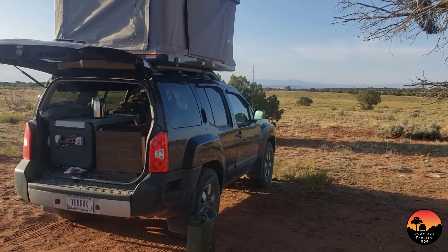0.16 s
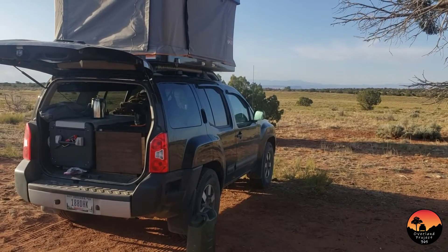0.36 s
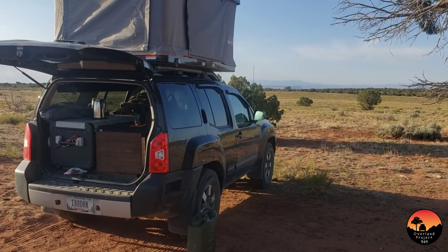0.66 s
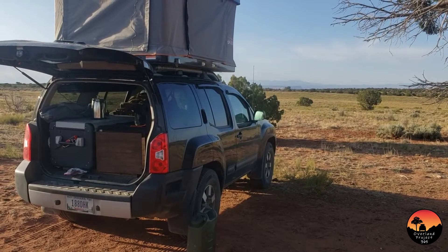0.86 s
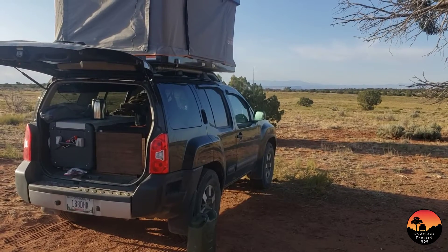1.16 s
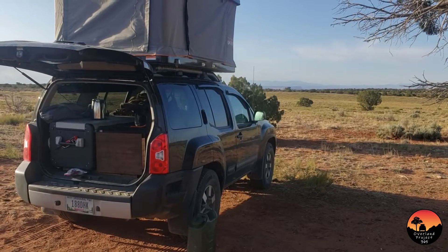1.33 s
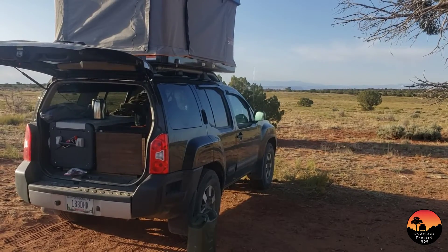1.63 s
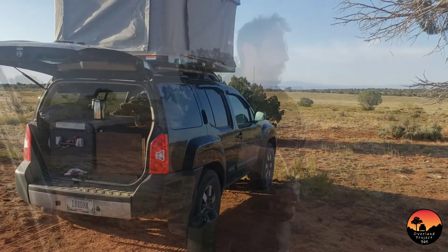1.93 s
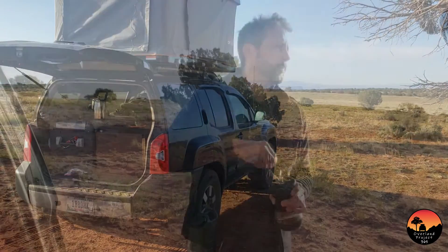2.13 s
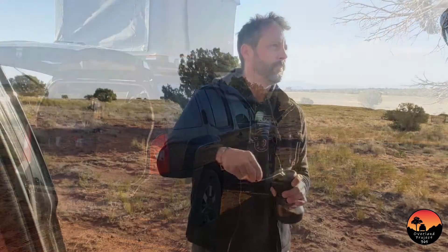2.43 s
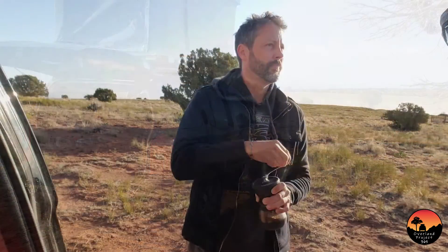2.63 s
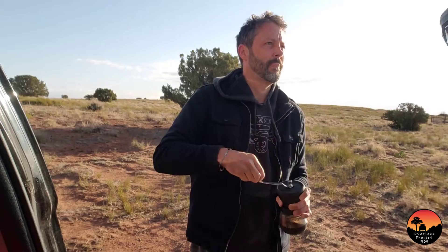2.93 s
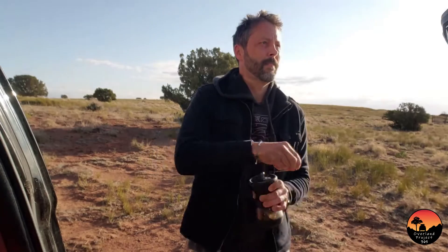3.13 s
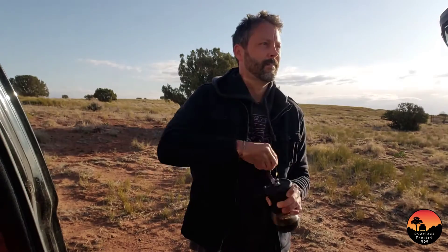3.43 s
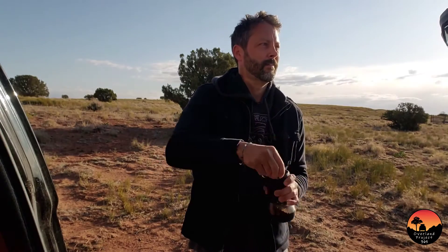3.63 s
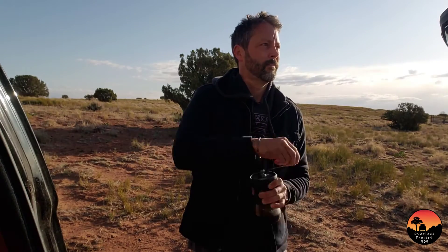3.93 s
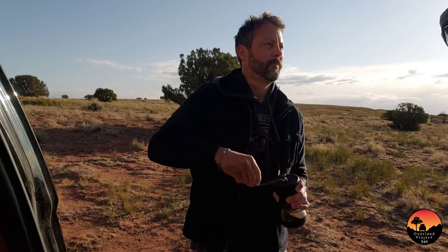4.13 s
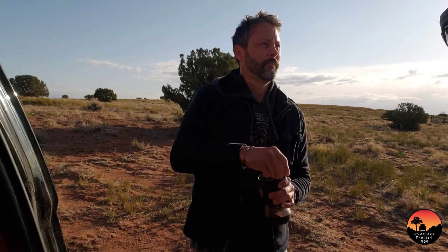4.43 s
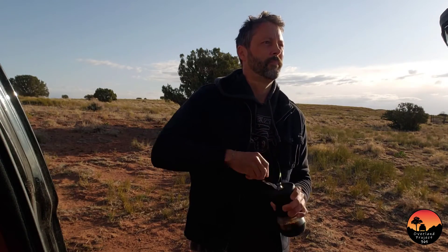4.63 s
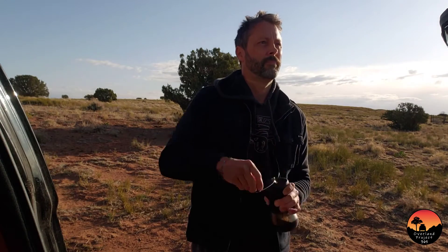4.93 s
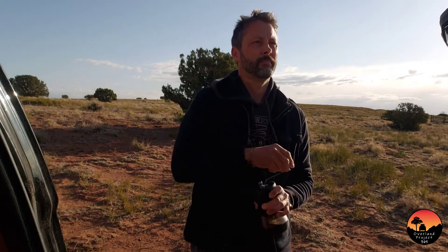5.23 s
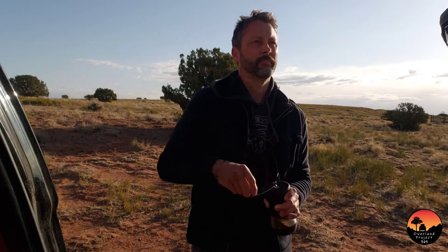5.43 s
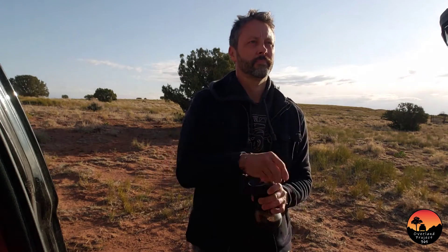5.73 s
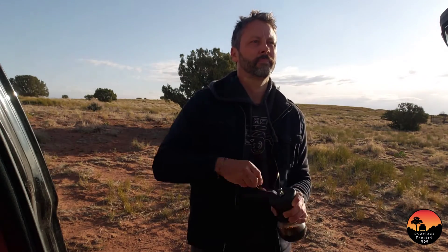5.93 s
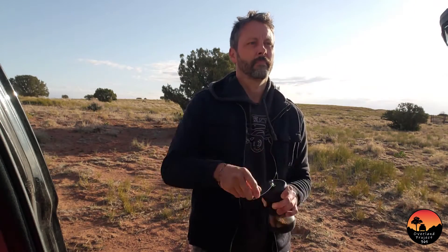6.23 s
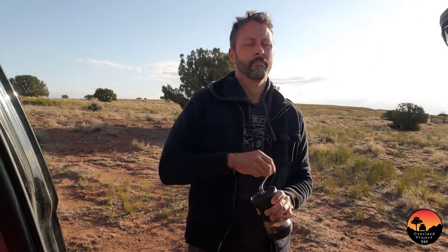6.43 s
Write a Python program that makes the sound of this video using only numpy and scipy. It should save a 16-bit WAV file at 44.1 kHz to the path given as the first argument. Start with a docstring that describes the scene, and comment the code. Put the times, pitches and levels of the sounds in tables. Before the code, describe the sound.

First only soft, low wind and a thin steady hiss in open desert air. Then manual coffee grinding fades in over about a second, close and dry: irregular hard cracks, small chips and fine grit ringing a small housing, pushed harder roughly twice a second. A low hollow judder comes from the jar beneath. The crunching is still going when it stops.

```python
"""First a low breeze at an open, quiet campsite, made of coloured noise; it moans softly in the gusts over a faint hiss.
Then a hand-crank coffee grinder fades in: beans crumble and snap between the burrs, hardest in each turn's push.
Each fracture is a burst of tiny blows that rings the housing, and a judder of small blows makes the jar rumble.
Clothes, a parked car and the ground add a very short scatter of reflections, made of moving delays."""
import sys
import numpy as np
from scipy import signal
from scipy.fft import rfft, irfft, next_fast_len
from scipy.io import wavfile
from scipy.ndimage import uniform_filter1d, map_coordinates

SR = 44100
rng = np.random.default_rng(int(sys.argv[2]) if len(sys.argv) > 2 else 0)


def dump_mix(stems):
    """Bounce the given channels to the path in sys.argv[1] as a 16-bit WAV at rate SR."""
    frames = np.atleast_2d(stems).T  # one column per channel
    limited = np.clip(frames, -1, 1)  # hard clip at full scale
    pcm = np.round(limited * 32767).astype(np.int16)
    wavfile.write(sys.argv[1], SR, pcm)


N = 289737

# spectra of the breeze, its moan and the steady hiss, each relative: pitch_hz, level_db (per Hz)
BREEZE_COLOUR = [(15, -59), (25, -32), (64, -1), (81, -4.5), (97, -6), (123, -6.5), (182, 0), (230, -12),
                 (300, -46), (510, -120)]
MOAN_COLOUR = [(150, -27), (240, -6), (290, 1.5), (340, -3.5), (400, -19.5), (560, -28), (1000, -47),
               (2000, -90)]
HISS_COLOUR = [(350, 3), (600, -4), (943, -8.5), (1240, -8.5), (1560, -10.5), (1670, -10.5), (4420, -13),
               (7140, -21), (9140, -20), (11700, -7.5), (15800, -7.5)]
# gusts of the breeze, before left and right are balanced: centre_s, half_length_s, rumble_db, moan_db
GUSTS = [(0.282, 0.34, -66.5, -75.5), (1.53, 0.15, -70, -70)]
# hard push in each turn of the crank, before the layers are mixed:
# centre_s, half_length_s, crumbling_db, grit_db (fine grit scraping on the burrs)
CRANK_PUSHES = [(2.173, 0.098, -42.5, -51.5), (2.516, 0.085, -45, -54), (3.008, 0.043, -45.5, -55),
                (3.48, 0.062, -41, -47), (3.853, 0.13, -44.5, -55), (4.374, 0.052, -53, -64),
                (4.77, 0.15, -49, -60), (5.176, 0.085, -44, -51), (5.668, 0.15, -43.5, -53.5),
                (6.095, 0.11, -43, -50), (6.567, 0.026, -58, -64)]
# loudest beans snapping: start_s, drive_db (middle modes), body_db and edge_db (low and high modes,
# relative to drive_db), crack_share (0-1, weight of the first crack against the debris)
BEAN_SNAPS = [(2.0041, -44, -2, -25, 0.1), (2.137, -37, -24, -17, 0.9), (2.1778, -38, -14.5, -17, 0.6),
              (2.2741, -34.5, -10, -22, 0.54), (2.3181, -40.5, -3, -10, 0.2), (2.4106, -38.5, -10, -15, 1),
              (2.4399, -27.5, -10, -23, 0.65), (2.4799, -32, -8, -11, 0.47), (2.6288, -34, -10, -18, 0.35),
              (2.7383, -35, -5, -25, 0.5), (2.7711, -30.5, -11, -16.5, 1), (2.9094, -26, -24, -12, 0.94),
              (2.9492, -33, -9, -16, 0.65), (3.03, -28.5, -26, -27, 0.88), (3.0521, -30, -15, -11, 0.83),
              (3.2289, -34, -9, -27, 0.6), (3.2543, -33, -6.5, -23, 0.17), (3.3125, -29.5, -13, -11, 0.82),
              (3.3652, -35.5, -22, -8.5, 0.6), (3.377, -32, -22, -10, 1), (3.4165, -44, -11, -21, 0.7),
              (3.4422, -35, -13, -16, 0.7), (3.5015, -30, -11, -7, 0.65), (3.5793, -33, -9, -26, 0.6),
              (3.6321, -33, -12, -14.5, 0.43), (3.6546, -26, -19, -28, 1), (3.7216, -34, -3.5, -16, 0.24),
              (3.7454, -27, -24, -14, 0.5), (3.8014, -36.5, -6.5, -20, 0.7), (3.8197, -27, -8.5, -10, 0.5),
              (3.9019, -26, -7, -14, 0.72), (3.9214, -41, -3, -24, 0.95), (3.9953, -28.5, -8.5, -17, 0.27),
              (4.1336, -28, -9, -15.5, 0.56), (4.1865, -32.5, -14, -16.5, 0.45),
              (4.336, -32.5, -9, -17, 0.2), (4.3627, -25.5, -9, -19, 0.4), (4.5078, -30.5, -5.5, -14, 0.63),
              (4.595, -30, -11, -9.5, 0.97), (4.6708, -36, -25, -10, 0.7), (4.7022, -29, -21, -31, 0.84),
              (4.7123, -34, -11, -12, 0.34), (4.7416, -23, -9, -12.5, 0.99), (4.8269, -33, -8, -14, 0.7),
              (4.8606, -39, -9, -16, 0.7), (5.009, -31.5, -23, -16, 0.45), (5.0221, -30.5, -31, -13, 0.5),
              (5.1385, -25.5, -10.5, -11, 0.46), (5.173, -30, -8, -10, 0.5), (5.2173, -31, -27, -23, 0.8),
              (5.2614, -33, -15, -14, 0.46), (5.3467, -37, -19, -26, 0.9), (5.4326, -40.5, 2, -13, 0.96),
              (5.5727, -35.5, -6, -11, 0.54), (5.6548, -31.5, -18, -13, 0.88),
              (5.7022, -30.5, -12, -19, 0.87), (5.7289, -38, -5, -23, 0.5),
              (5.7881, -33.5, -3.5, -15, 0.35), (5.8865, -33.5, -4.5, -13, 0.6),
              (5.9377, -32.5, -9, -15, 0.7), (5.9755, -33, -25, -14, 0.3), (6.0362, -33.5, -18, -15, 0.9),
              (6.1127, -31, -12, -7.5, 0.9), (6.1404, -34, -4, -10, 1), (6.1684, -34, -18, -10, 0.7),
              (6.2075, -32, -4.5, -14, 0.44), (6.351, -38, -25, -6, 0.5), (6.4413, -32, -29, -14, 0.57),
              (6.5256, -33, -19, -17, 0.6), (6.539, -28, -13, -14.5, 0.35)]
# extra drive of every snap on the low, middle and high modes: drive_db
SNAP_DRIVE_DB = [25.5, 16.5, 29]
# resonances of the burrs and their housing; width is for one of two equal stages, level is relative:
# pitch_hz, width_hz, level_db (both stages), left_minus_right_db, right_lead_rad
BURR_MODES = [(660.6, 216, -9.5, 1.5, 1.11), (838, 160, -12, -15, 1.77), (1048, 220, -18.5, 6, -0.33),
              (1394, 700, -14, -2, -1.8), (1936, 406, -18, 17, 1.1), (2142, 344, -10, 0.5, 0.47),
              (2600, 500, -15, 0.5, -1.26), (3514, 900, -15.5, 5.5, -1.7), (4520, 1300, -20.5, -1, -1.55),
              (6070, 1300, -24, -5, -1.35), (6810, 345, -25, -14, -0.29), (10280, 3800, -34, -3.5, 0.69),
              (11390, 740, -23, -1.5, -0.094), (12330, 900, -22.5, -9, 0.2), (13600, 7200, -32, -3, -0.78)]
# hollow resonances of the hand-held jar, same columns:
# pitch_hz, width_hz, level_db, left_minus_right_db, right_lead_rad
JAR_MODES = [(79.8, 50.5, -6.5, -8.5, 0.082), (137, 62.5, -4, -3.5, -0.073), (167.9, 39.2, 1.5, -5.5, 0.15),
             (197.2, 23, -3, 7.5, 0.03), (315.6, 102, -8, -4.5, 0.71), (399, 124, -9.5, -3.5, 0.82)]
# loudness of the jar's rumble before its overall trim, with a thump near 3.68 s: time_s, level_db
JAR_RUMBLE = [(1.8, -71.5), (2.2, -53), (2.94, -45), (3.42, -47.5), (3.46, -44.5), (3.61, -49), (3.68, -42),
              (3.75, -47), (3.92, -46), (6.49, -48.5), (6.5, -47)]

BREEZE_REST_DB, MOAN_REST_DB = -73.5, -84  # between the gusts
HISS_DB = -74
CRUMB_REST_DB, GRIT_REST_DB = -46.5, -59  # between the pushes, before mixing
RUB_DB = -50  # beans tumbling steadily against the housing, before the fade
# the grinding cuts in softly and fades up
FADE_START_S, FADE_S, FADE_POWER, FADE_FROM_DB = 1.85, 0.99, 1.2, -22.5
CRACK_DELAY_S = .0011  # time from a snap's listed start to its crack
CHIPS_PER_S, CHIP_DB, CHIP_SPREAD_DB = 17, 21.5, 7  # chip level is added to crumbs of rms 1
GRIND_DOWN_DB, GRIND_DOWN_S = -0.8, 0.025  # grinding of the pieces: level against splinters, decay
BUILD_S, SPLINTER_S, CHIP_S = .0016, .009, .004  # rise before the crack; decay for a bean, for a chip
JAR_TRIM_DB = 0.5
TOP_HZ = 15900


def undb(db):
    """Turn decibels into a gain."""
    return 10 ** (np.asarray(db) / 20)


def unit(x):
    """Scale to rms 1."""
    return x / np.sqrt(np.mean(x ** 2))


def walk(rate):
    """Random wander with a spread near 1: straight lines between `rate` random points a second."""
    steps = np.arange(N) / SR * rate
    return 1.2 * np.interp(steps, np.arange(N // 8), rng.standard_normal(N // 8))


def coloured(points):
    """Two unrelated noises, shaped to the given spectrum."""
    hz, db = np.transpose(points)
    f = np.maximum(np.fft.rfftfreq(N, 1 / SR), 1)
    shape = undb(np.interp(np.log(f), np.log(hz), db))
    white = rng.standard_normal((2, N))
    return unit(irfft(rfft(white) * shape, N))


def swells(rest_db, times, lengths, peaks_db):
    """Gain that rises and falls smoothly round the given moments; rest and bumps add as powers."""
    t = np.arange(0, N, SR // 500) / SR
    bumps = undb(peaks_db) ** 2 * np.exp(-((t[:, None] - times) / lengths) ** 2)
    gain = np.sqrt(undb(rest_db) ** 2 + bumps.sum(axis=1))
    return np.interp(np.arange(N) / SR, t, gain)


def outdoors():
    """A low breeze, nearly alike in both ears, moans softly in the gusts under a faint steady hiss."""
    times, lengths, rumble_db, moan_db = np.transpose(GUSTS)
    rumble = coloured(BREEZE_COLOUR) * swells(BREEZE_REST_DB, times, lengths, rumble_db)
    rumble = rumble * undb(walk(10))  # wanders by about 1 dB
    moan = coloured(MOAN_COLOUR) * swells(MOAN_REST_DB, times, lengths, moan_db)
    mid, side = rumble + moan
    breeze = mid + undb(-17.0) * side * np.array([[1], [-1]])
    breeze = breeze * undb([[-2], [1.6]])  # a little stronger on the right
    return breeze + undb(HISS_DB) * coloured(HISS_COLOUR)


def grains(rate, spread_db):
    """Tiny fractures of unequal size at random moments, `rate` a second on average."""
    hits = rng.random(N) < rate / SR
    return hits * undb(spread_db * np.clip(rng.standard_normal(N), -2, 2))


def cascades(rate, spread_db, decay_s, steady):
    """Strength of fracturing: flurries start at once and die away, over a steady share."""
    decay = np.exp(-1 / (decay_s * SR))
    flurries = signal.lfilter([1], [1, -decay], grains(rate, spread_db))
    return steady + unit(flurries)


def fade_in():
    """Gain that brings the steady grinding in."""
    progress = (np.arange(N) / SR - FADE_START_S) / FADE_S
    first = undb(FADE_FROM_DB)
    return (progress > 0) * (first + (1 - first) * np.clip(progress, 0, 1) ** FADE_POWER)


def fracture(crack_share, splinter_s):
    """A sharp crack amid dying splinters, then the pieces are ground down; returns times and force."""
    t = np.arange(-SR // 100, SR // 10) / SR

    def shower(decay_s):
        """Power of small pieces that start just before the crack, and trail after it."""
        envelope = np.exp(np.minimum(t / BUILD_S, -t / decay_s))
        pieces = (rng.random(len(t)) < .02) * rng.random(len(t)) * envelope
        return pieces ** 2 / np.sum(pieces ** 2)

    # the crack is one hard blow with a few close aftershocks
    aftershocks = (rng.random(len(t)) < .16) * (t > 0) * np.exp(-abs(t) / .0006)
    crack = (t == 0) + aftershocks
    crack_power = crack ** 2 / np.sum(crack ** 2)
    debris_power = shower(splinter_s) + undb(GRIND_DOWN_DB) ** 2 * shower(GRIND_DOWN_S)
    share = np.clip(crack_share, 0, 1)
    return t, np.sqrt(share * crack_power + (1 - share) * debris_power)


def chips():
    """Small pieces crack at loosely even intervals as the teeth of the burr catch them."""
    force = np.zeros(N + SR)
    for k, (slip, size) in enumerate(rng.uniform(-1, 1, (200, 2))):
        start = int((k + .5 + slip / 2) / CHIPS_PER_S * SR)
        if start < N:
            t, burst = fracture(crack_share=0.67, splinter_s=CHIP_S)
            force[start:start + len(t)] += undb(CHIP_DB + CHIP_SPREAD_DB * size) * burst
    return force[:N]


def snaps():
    """Whole beans snap; each gives a force on the low, middle and high modes."""
    force = np.zeros((3, N + SR))
    for start_s, drive_db, body_db, edge_db, crack_share in BEAN_SNAPS:
        t, burst = fracture(crack_share, SPLINTER_S)
        start = int((start_s + CRACK_DELAY_S + t[0]) * SR)
        push_db = drive_db + np.array([body_db, 0, edge_db]) + SNAP_DRIVE_DB
        force[:, start:start + len(t)] += np.outer(undb(push_db), burst)
    return force[:, :N]


def ring(modes, force_at, flare_db, diffuse_hz):
    """Damped resonances in two ears, with unit power gain in all; force_at(hz) gives the blows on each."""
    size = next_fast_len(N + SR // 8, True)
    f = np.maximum(np.fft.rfftfreq(size, 1 / SR), 1)
    out, power = 0, 0
    for hz, width_hz, db, pan_db, lead in modes:
        # two equal resonant stages in a row
        response = undb(db) / (1 + 1j * (f / hz - hz / f) * hz / width_hz) ** 2
        # the contact wanders round the burr, so each mode flares and fades on its own
        blows = force_at(hz) * undb(flare_db * walk(14))
        # each blow pushes one way or the other; short waves reach the two ears less alike
        left = np.where(rng.random(N) < .5, blows, -blows)
        flipped = rng.random(N) < .5 * hz / (hz + diffuse_hz)
        right = np.where(flipped, -left, left)
        ears = np.array([[undb(pan_db / 2)], [undb(-pan_db / 2) * np.exp(1j * lead)]])
        out = out + ears * response * rfft(np.float32([left, right]), size)
        power += np.mean(abs(response) ** 2)
    return irfft(out, size)[:, :N] / np.sqrt(power)


def burrs():
    """Coarse crumbs and snapping beans drive the housing; fine grit drives the highest burr modes."""
    snap_body, snap_middle, snap_edge = snaps()
    times, lengths, crumb_db, grit_db = np.transpose(CRANK_PUSHES)
    flurries = cascades(rate=260, spread_db=0.5, decay_s=0.0043, steady=0.64)
    crumbs = unit(grains(rate=6000, spread_db=2.5) * flurries)
    grit = unit(grains(rate=15000, spread_db=1.1) * flurries)
    chip = chips()
    fade = fade_in()
    rub = crumbs * undb(RUB_DB) * fade
    crumbs = (crumbs + chip) * swells(CRUMB_REST_DB, times, lengths, crumb_db) * fade
    grit = (grit + undb(7.5) * chip) * swells(GRIT_REST_DB, times, lengths, grit_db) * fade
    low = undb(-11.5) * crumbs + rub + snap_body
    middle = undb(-3.0) * crumbs + snap_middle
    high = undb(5.0) * grit + snap_edge

    def force_at(hz):
        """Big pieces push the low modes, fine grit the high ones."""
        low_share = np.interp(np.log(hz), np.log([1000, 1600]), [1, 0])
        high_share = np.interp(np.log(hz), np.log([3200, 10000]), [0, 1])
        middle_share = 1 - low_share - high_share
        return low_share * low + middle_share * middle + high_share * high

    return ring(BURR_MODES, force_at, flare_db=2.16, diffuse_hz=8520)


def scatter(x, wet_db, t60_s, sway_s, count):
    """Short reflections off clothes, car and ground; paths change as the grinder sways in the hand."""
    delays = np.linspace(.001, .012, count)
    gains = undb(-60 * delays / t60_s)
    gains *= undb(wet_db) / np.sqrt(np.sum(gains ** 2))
    out = x.copy()
    for delay, gain in zip(delays, gains):
        for side in range(2):
            lag = (delay + sway_s * (walk(5) + rng.standard_normal())) * SR
            source = np.arange(N) - np.abs(lag).astype(int)
            out[side] += gain * np.take(x[side], source, mode="clip")
    return out


def waver(x, depth, rate):
    """Grip and bean load keep changing, so the resonances slide a little: time is stretched and squeezed."""
    wander = uniform_filter1d(walk(rate), SR // 100)
    place = np.arange(N) + depth * SR / rate * wander
    return np.array([map_coordinates(side, [place], order=3) for side in x])


def jar():
    """The shaft judders as beans catch and give: flurries of small blows make the hollow jar rumble."""
    flurries = cascades(rate=49, spread_db=-1.5, decay_s=0.021, steady=3.0)
    judder = unit(grains(rate=1800, spread_db=2) * flurries)
    t = np.arange(N) / SR
    rumble_db = np.interp(t, *np.transpose(JAR_RUMBLE))
    judder = judder * undb(JAR_TRIM_DB + rumble_db) * (t > FADE_START_S)
    return ring(JAR_MODES, lambda hz: judder, flare_db=0.0, diffuse_hz=8600)


def scene():
    """The breeze, and the grinder in the open air: only the burrs' crunch is scattered and wavers."""
    air = outdoors()
    crunch = scatter(burrs(), wet_db=-7, t60_s=0.039, sway_s=.0003, count=7)
    crunch = waver(crunch, depth=.013, rate=40)
    return crunch + jar() + air


def record(dry):
    """A steep low-pass filter cuts the very top of the treble."""
    return signal.sosfilt(signal.ellip(10, .2, 70, TOP_HZ, fs=SR, output="sos"), dry)


dry = scene()
out = record(dry)
dump_mix(out)
```